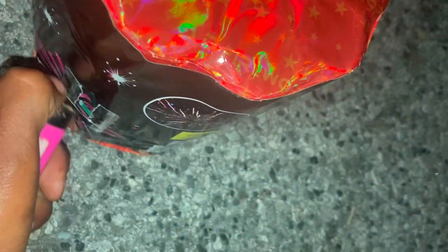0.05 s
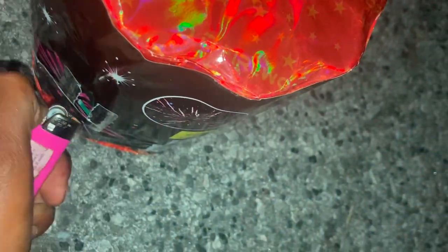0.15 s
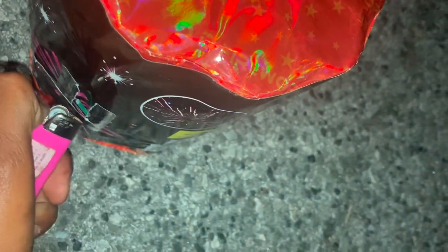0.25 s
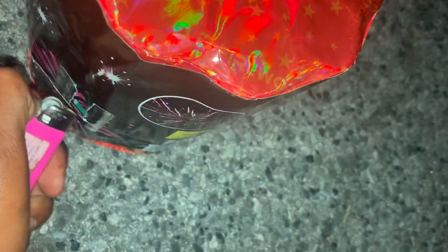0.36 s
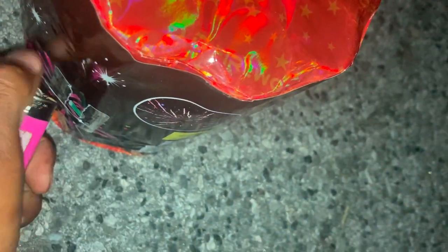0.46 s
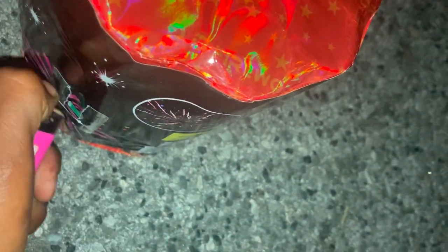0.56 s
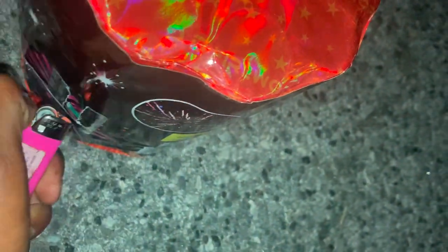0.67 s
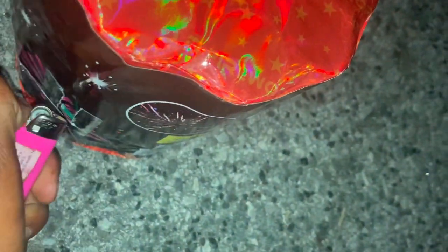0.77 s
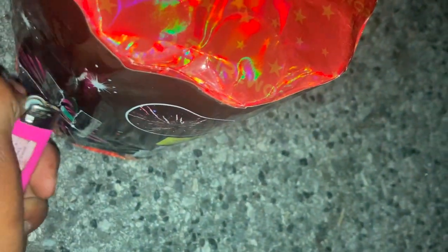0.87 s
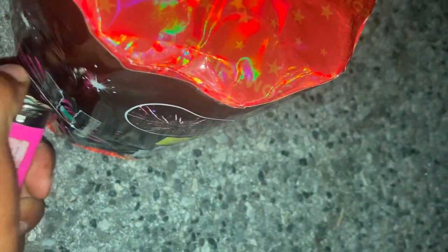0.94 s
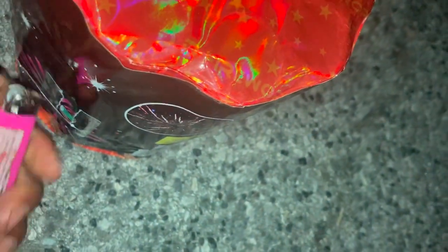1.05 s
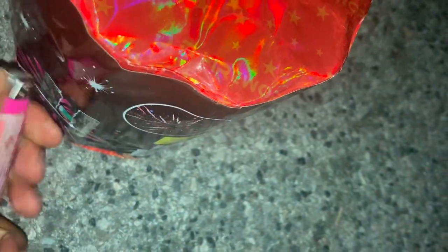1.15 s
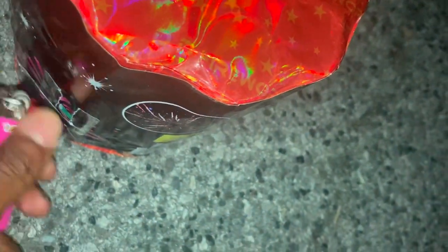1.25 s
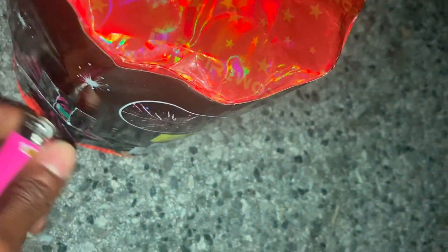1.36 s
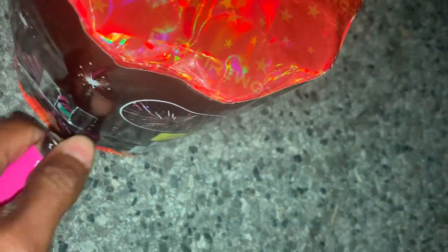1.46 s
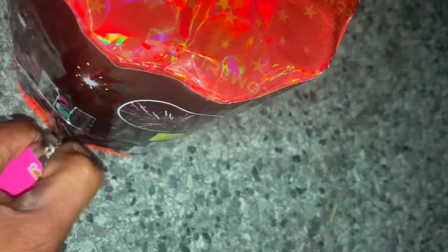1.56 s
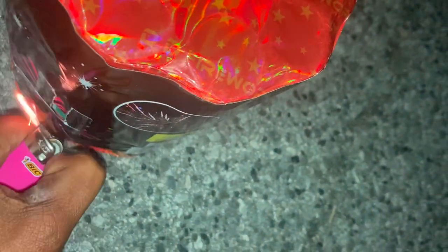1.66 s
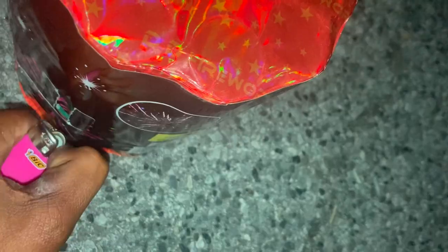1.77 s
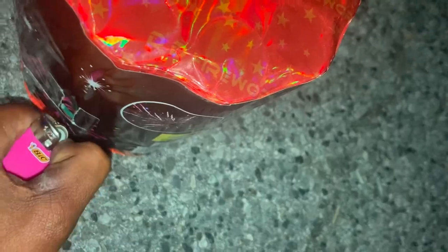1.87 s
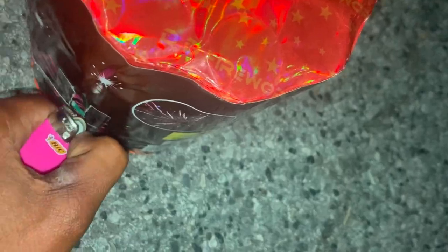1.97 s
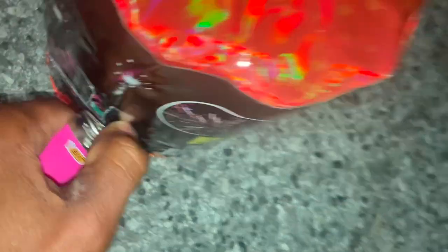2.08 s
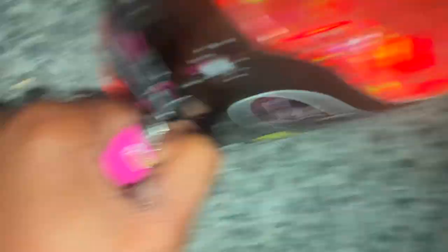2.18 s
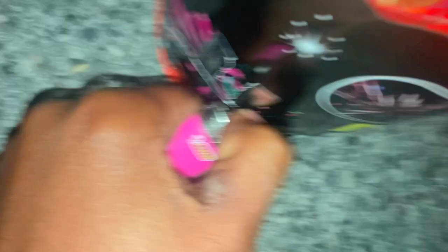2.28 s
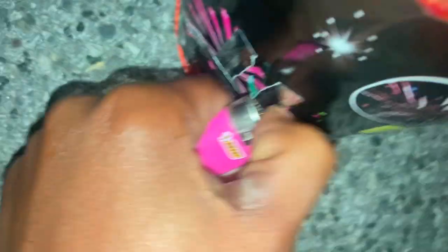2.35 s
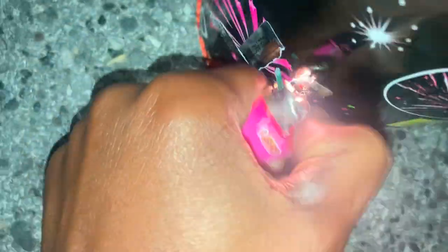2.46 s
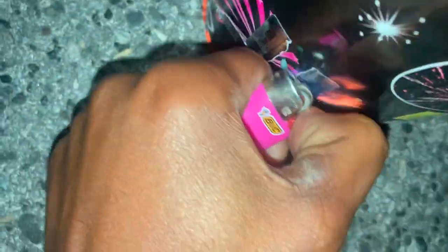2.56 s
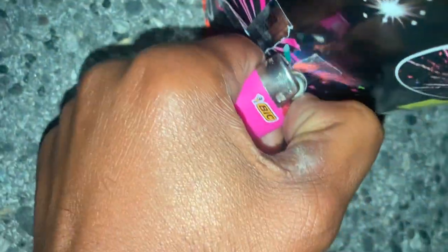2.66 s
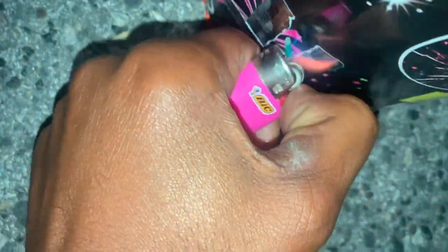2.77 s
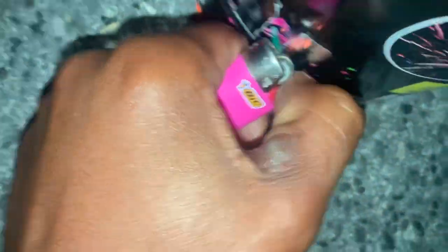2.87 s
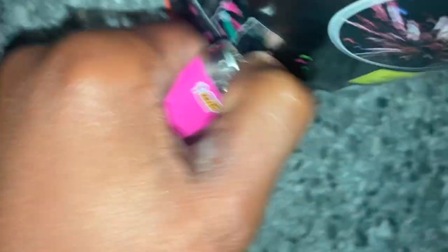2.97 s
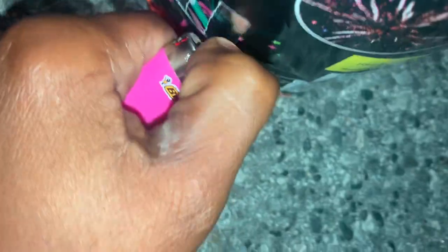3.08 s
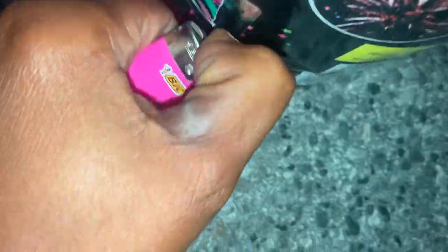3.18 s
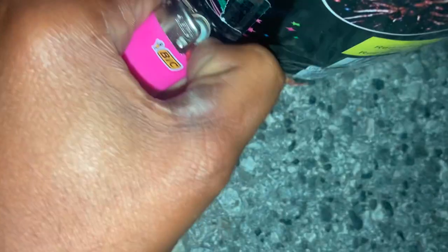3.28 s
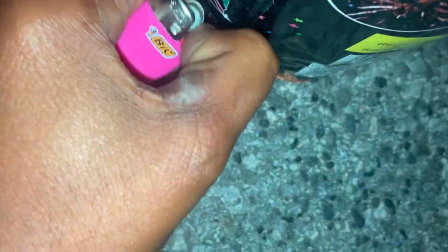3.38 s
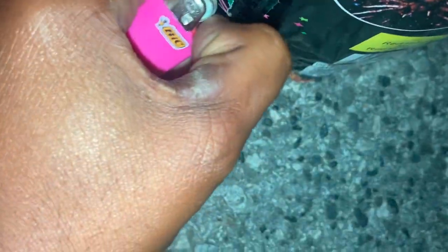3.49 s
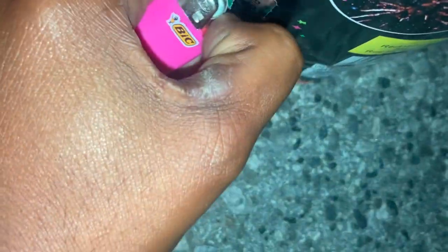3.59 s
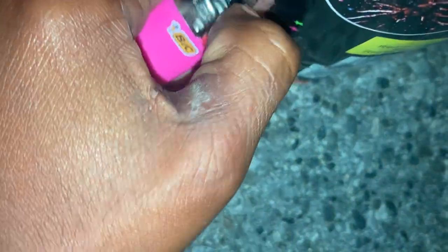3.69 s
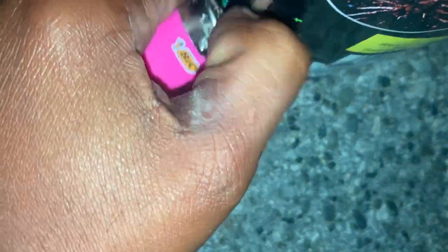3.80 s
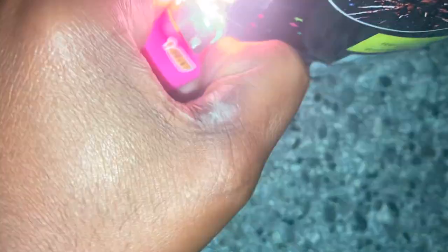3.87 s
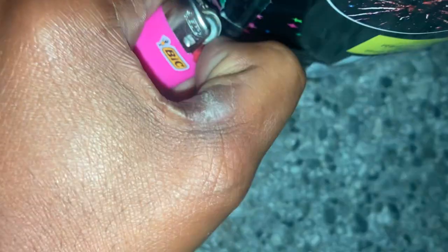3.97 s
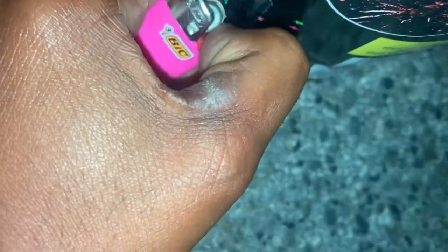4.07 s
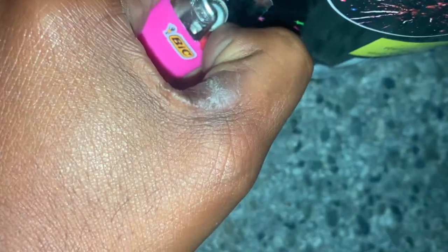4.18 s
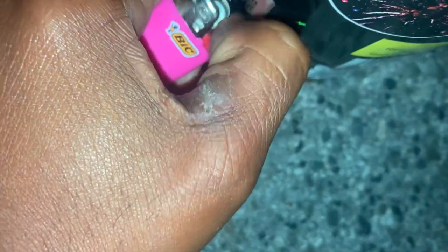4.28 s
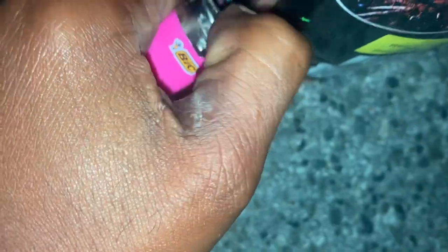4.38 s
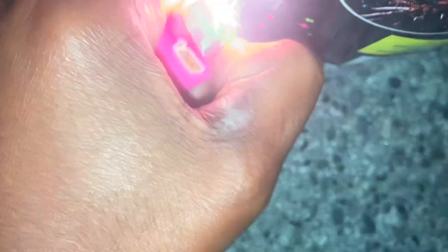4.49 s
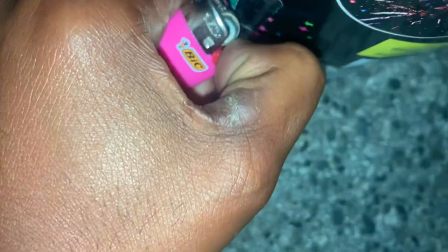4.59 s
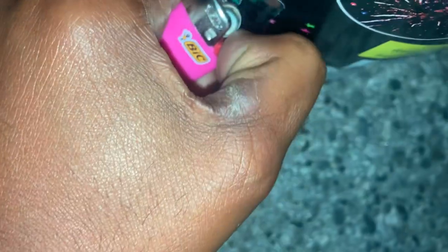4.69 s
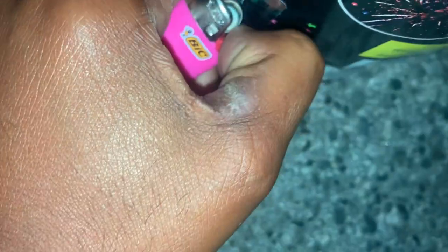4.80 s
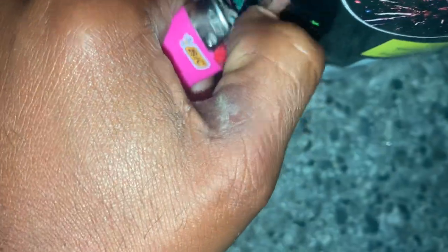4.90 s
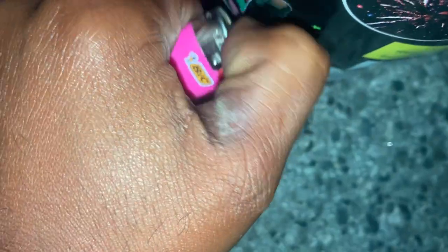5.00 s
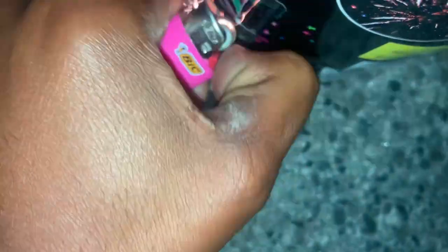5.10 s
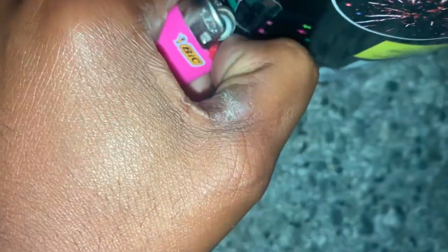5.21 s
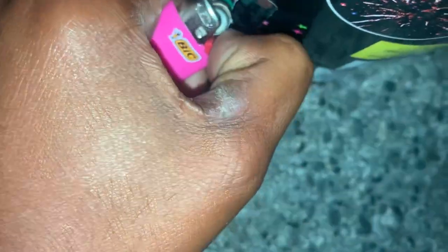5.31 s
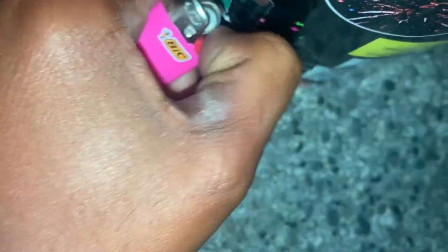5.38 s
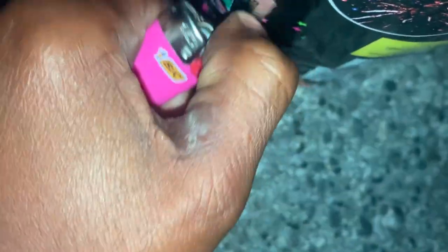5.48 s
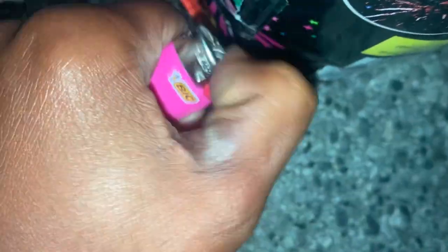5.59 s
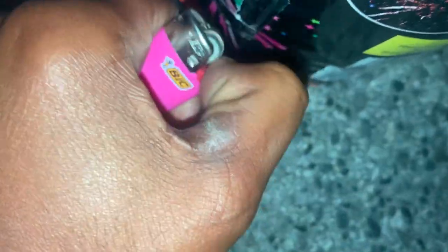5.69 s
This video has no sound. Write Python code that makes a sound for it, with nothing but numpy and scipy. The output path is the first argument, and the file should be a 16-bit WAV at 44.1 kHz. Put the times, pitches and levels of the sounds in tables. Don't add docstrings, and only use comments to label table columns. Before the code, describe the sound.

Outdoors in open air, dry steel-on-flint rasps crack close to a handheld stereo microphone, roughly every half to one second. Small lever clicks and dull plastic taps precede the later spins as the thumb resets. Behind lies gusty low rumble and soft airy hiss, with a far tree stirring mid-way. The background dips briefly after the strongest snaps, then recovers. There is practically no reverberation.

```python
import sys
import numpy as np
from scipy import signal
from scipy.fft import rfft, irfft, next_fast_len
from scipy.io import wavfile
from scipy.ndimage import uniform_filter1d

SR = 44100
rng = np.random.default_rng(int(sys.argv[2]) if len(sys.argv) > 2 else 0)


def ratio(d):
    e = np.asarray(d, float) / 20
    return 10 ** e


def pcm_store(signal):
    levels = np.round(np.clip(np.atleast_2d(signal), -1, 1) * 32767)
    wavfile.write(sys.argv[1], SR, levels.astype(np.int16).T)


N = 253465

# (fastest moment [s], scrape level [dB], run-up [s], run-out [s], gain duck [dB])
SPINS = [
    (0.14, -20, 0.016, 0.0064, 0),
    (.636, -24.5, 0.028, 0.016, 0.5),
    (1.614, -25, 0.016, 0.0091, 0),
    (2.49, -17.5, 0.016, 0.013, 3),
    (3.246, -17.5, 0.024, 0.013, 2.5),
    (3.876, -16.5, 0.017, 0.0097, 1),
    (4.512, -16.5, 0.017, 0.013, 2),
    (5.083, -20.5, 0.021, 0.013, 3.5),
    (5.626, -17.5, 0.015, 0.01, 1.5),
]
# (frequency [Hz], width [Hz], level [dB])
STEEL_MODES = [(1730, 490, -35), (2470, 3700, -9), (3720, 1940, -3), (5084, 1930, -8.5), (6510, 940, -5),
               (6810, 2000, 0), (8450, 955, 6), (10230, 1500, 2), (11360, 1100, 4), (13200, 2185, 0.5),
               (14700, 2900, -15)]
# (frequency [Hz], level per Hz [dB])
HISS_SPECTRUM = [(4500, -25.5), (6000, -7), (7500, -1.5), (8700, -5.5), (10300, -5.5), (12000, -4),
                 (13700, -13.5), (15000, -17.5), (15800, -14), (16500, -64.5)]

TICK_T60_S, TICK_KNOCK_DB = 0.0091, -22.5


def along(points, hz):
    f, v = np.transpose(points)
    return np.interp(np.log(hz + 1), np.log(f + 1), v)


def curves(rows):
    s, *cols = np.transpose(rows)
    return [np.interp(np.arange(N) / SR, s, c) for c in cols]


def unit(x):
    return x / np.sqrt(np.mean(x ** 2) + 1e-20)


def filtered(x, response):
    n = x.shape[-1]
    m = next_fast_len(n + 2048)
    return irfft(rfft(x, m) * response(np.fft.rfftfreq(m, 1 / SR)), m)[..., :n]


def add(track, s, sound):
    track[round(s * SR):][:len(sound)] += sound


def ports(pair):
    lag_s, cavity_hz = 10 / SR, 5050

    def turn(hz):
        return 2 * np.pi * hz * lag_s - 3.45 / (1 + (cavity_hz / (hz + 1)) ** 20)

    return filtered(pair, lambda hz: np.exp(-1j * np.outer([1, 0], turn(hz))))


def rush(spectrum, patchy_db):
    # (frequency [Hz], correlation [-1 to 1])
    likeness = [(60, 0.96), (250, 0.91), (500, 0.51), (800, 0.52), (1500, 0.59), (3000, 0.069),
                (5500, 0.22), (7000, 0.95), (8700, 0.92), (10500, 0.57), (13700, 0.93)]
    z = signal.stft(rng.standard_normal((2, N)), nperseg=512)[2]
    field = uniform_filter1d(rng.standard_normal(z.shape[1:]), size=6, axis=0)
    field = uniform_filter1d(field, size=14, axis=1)
    pair = signal.istft(z * ratio(patchy_db * unit(field)), nperseg=512)[1][:, :N]

    def spread(hz):
        angle = np.arccos(np.clip(along(likeness, hz), -1, 1)) / 2
        return ratio(along(spectrum, hz)) * [np.cos(angle), np.sin(angle)]

    same, other = filtered(pair, spread)
    return unit(np.array([same + other, same - other]))


def wind():
    # (time [s], gust strength [dB], exposure past the hand [dB])
    gusts = [(0.0, -3.5, 3), (0.45, -2, 1), (0.82, 1, -1.5), (1.15, -0.5, -3), (1.76, -1.5, -0.5),
             (2.34, -2.5, 3), (2.48, -1.5, -2), (2.69, -1.5, -2), (3.06, .5, -3.5), (3.3, -2, -8.5),
             (3.8, -2, -9), (4.2, -0.5, -12), (4.75, -2, -9), (4.92, -0.5, -10), (5.06, 0.5, -12.5),
             (5.23, -2, -11.5), (5.47, 0.5, -11.5), (5.75, -2.5, -15)]
    # (frequency [Hz], level per Hz [dB])
    rumble_spectrum = [(13, -55), (22, -31), (37, -8), (60, 1), (88, 0), (107, 1.5), (150, -6), (214, -5.5),
                       (244, -10), (333, -15), (395, -17.5), (500, -20), (650, -41), (1100, -120)]
    body_spectrum = [(150, -59), (300, -8), (500, -1.5), (900, -1.5), (1200, -5.5), (1600, -10),
                     (2200, -18), (3000, -18), (5000, -26.5), (6300, -33.5), (7500, -51.5)]
    leaves_spectrum = [(1300, -27), (1850, -8), (1960, -3), (2010, 9.5), (2090, 2.5), (2300, -0.5),
                       (2700, 0), (3300, -11), (4200, -10), (4650, -5), (5000, -6.5), (5300, -5),
                       (5800, -19), (7000, -38.5)]
    # (frequency [Hz], phase [rad])
    left_lead = [(30, 0), (340, .5), (700, 2.4), (1400, 3.1), (1720, 3.7), (2070, 5.9), (2760, 7),
                 (3600, 9.4), (4650, 12.3), (5860, 15.5), (8000, 21)]

    gust_db, exposure_db = curves(gusts)
    stir = np.interp(np.arange(N) / SR, np.cumsum([0.01, 0.46, 1.77, 1]), [0, 1, 1, 0])
    rumble_db = -28.5 + gust_db
    body_db = -40 + 0.45 * exposure_db - 0.47 * gust_db
    leaves_rest_db, leaves_stirred_db = -66, -46
    leaves_db = leaves_rest_db + (leaves_stirred_db - leaves_rest_db) * stir
    hiss_db = -58.5 + exposure_db + 0.1 * gust_db

    rumble = ratio(rumble_db + [[-.8], [.8]]) * rush(rumble_spectrum, patchy_db=1.08)
    body = ratio(body_db + [[3], [1.2]]) * rush(body_spectrum, patchy_db=2.0)
    leaves = ratio(leaves_db + [[-1.5], [-.8]]) * rush(leaves_spectrum, patchy_db=.9)
    hiss = ratio(hiss_db + 3) * rush(HISS_SPECTRUM, patchy_db=.5)

    def lead(hz):
        return np.exp(.5j * np.outer([1, -1], along(left_lead, hz)))

    return filtered(rumble + body + leaves, lead) + ports(hiss)


def ringing(x, modes, colour, scatter_db):
    hz, width, db = np.transpose(modes)[..., None]
    gain = ratio(db + scatter_db * rng.normal(size=hz.shape))
    sign = (-1) ** np.arange(len(modes))[:, None]

    def response(f):
        resonances = sign * gain * 1j * f * width / (hz * hz - f * f + 1j * f * width)
        return ratio(along(colour, f)) * np.sum(resonances, axis=0)

    return filtered(x, response)


def blow(modes, colour, t60_s, spike):
    t = np.arange(SR // 25) / SR
    fade = ratio(-60 * t / max(t60_s, .001)) * (1 - np.exp(-t / 0.00025))
    crack = fade * rng.standard_normal(len(t)) + spike * (np.arange(len(t)) == 4)
    sound = ringing(crack, modes, colour, scatter_db=1.0)
    return sound * np.linalg.norm(fade) / np.linalg.norm(sound) / 2


def shade(s):
    # (cup resonance [Hz], its strength [dB], tilt [dB per octave], tank body [dB])
    grip = [
        (3650, 17, 5.5, 8),
        (3470, 11, -2, -5),
        (4830, -2.5, -3, -15.5),
        (11800, 1, 4, 9.5),
        (4550, 4.5, 2, -7.5),
        (5660, 4.5, 4, 4),
        (6000, 3.5, 1, -6.5),
        (7000, 3, 2.5, -3.5),
        (7100, 1, 0.5, -8.5),
    ]
    cup_hz, strength_db, tilt_db, body_db = grip[np.argmin([abs(row[0] - s) for row in SPINS])]
    hz = np.geomspace(1000, 16000, 49)
    width_oct, dip_ratio, dip_depth = .28, 1.32, 0.55
    tilt_centre_hz, body_top_hz = 6000, 2450

    def bump(centre_hz):
        return np.exp(-(np.log2(hz / centre_hz) / width_oct) ** 2)

    cup_db = strength_db * (bump(cup_hz) - dip_depth * bump(cup_hz * dip_ratio))
    slope_db = tilt_db * np.log2(hz / tilt_centre_hz)
    return np.transpose([hz, cup_db + slope_db + body_db / (1 + (hz / body_top_hz) ** 8)])


def teeth():
    # (time [s], peak [dB], t60 [s])
    bites = [(0.138, 0, 0.0054), (0.1392, -2.5, 0.014), (0.1447, -10, 0.0058), (0.1495, -20, 0.0071),
             (0.633, -12, 0.0096), (0.6354, -2.5, 0.014), (0.645, -14, 0.009), (1.6141, -3.5, 0.017),
             (1.6167, -1, 0.0085), (1.6222, -13.5, 0.014), (2.487, -11.5, 0.014), (2.491, 0.5, 0.0096),
             (3.2455, -3, 0.013), (3.8708, -5.5, 0.011), (3.8754, 1.5, 0.0096), (3.8762, -10.5, 0.0043),
             (3.8855, -13, 0.0091), (4.5096, -3, 0.017), (5.0845, -3, 0.014), (5.6221, -13, 0.011),
             (5.6259, 4, 0.006), (5.6334, -18, 0.0051)]
    track = np.zeros(N + SR)
    for s, db, t60_s in bites:
        add(track, s, ratio(db + 1.5) * blow(STEEL_MODES, shade(s), t60_s, spike=1.9))
    return track[:N]


def wheel():
    track = np.zeros(N + SR)
    t = np.arange(-SR // 16, SR // 16) / SR
    for s, db, run_up_s, run_out_s, _ in SPINS:
        phase = np.abs(t) / np.where(t < 0, run_up_s, run_out_s)
        drag = ratio(-20) / (1 + phase ** 12)
        swell = ratio(db) * (ratio(-34 * phase ** 1.1) + drag)
        lumps = ratio(1.8 * unit(uniform_filter1d(rng.standard_normal(len(t)), size=40)))
        grit = rng.standard_normal(len(t)) * ratio(4 * rng.standard_normal(len(t)))
        scrape = ringing(grit, STEEL_MODES, shade(s), scatter_db=1.5)
        add(track, s + t[0], swell * unit(lumps * scrape))
    return track[:N]


def rattle():
    # (time [s], peak [dB], brightness [dB])
    loose = [(0.1575, -24, -18), (0.426, -34, 3), (0.435, -21, 13), (0.667, -37, -5), (0.8945, -33, 10),
             (0.901, -25, -4), (0.9071, -20.5, 8), (1.169, -29, 12), (2.044, -30, 8), (2.514, -24, -5),
             (2.596, -29, -11), (2.939, -30.5, 0), (3.2123, -34, 4), (3.266, -22, -26), (3.291, -24, 7),
             (3.836, -37, 5), (3.9103, -20.5, -7.5), (4.0823, -27.5, -1), (4.313, -38, -19),
             (4.343, -37, 1), (4.35, -33, -4), (4.485, -36, -4), (4.4964, -31, 9), (4.5378, -28, -4),
             (4.5544, -34, 2), (5.11, -22, -21), (5.118, -21, 0), (5.127, -18.5, 4), (5.168, -31, 15)]
    return [(s, db, bright_db, TICK_T60_S, TICK_KNOCK_DB) for s, db, bright_db in loose]


def presses():
    # (time [s], peak [dB], knock [dB], rebound delay [s], rebound level [dB])
    takeups = [
        (3.0681, -60, 22, .004, -23.5),
        (3.695, -15.5, -16, .0088, -13),
        (4.3207, -14, -13.5, 0.008, -15.5),
        (4.8831, -13, -16, .0134, -12),
        (5.4838, -21, -14, 0.0054, -25),
    ]
    bright_db = -4
    rows = []
    for s, db, knock_db, gap_s, rebound_db in takeups:
        rows.append((s, db, bright_db, 0.0059, knock_db))
        rows.append((s + gap_s, db + rebound_db, bright_db, TICK_T60_S, knock_db + 1.5))
    return rows


def landings():
    # (time [s], peak [dB], brightness [dB], settling delay [s])
    touches = [
        (3.6484, -26.5, -1.5, 0.0091),
        (4.2724, -28, -1, .0097),
        (4.829, -24.5, 3, .0094),
        (5.4078, -21, 8.5, 0.007),
    ]
    knock_db = -28
    rows = []
    for s, db, bright_db, gap_s in touches:
        rows.append((s, db, bright_db, TICK_T60_S, knock_db))
        rows.append((s + gap_s, db - 11, bright_db, TICK_T60_S, knock_db))
    return rows


def ticks():
    # (frequency [Hz], width [Hz], level [dB])
    lever_modes = [(2940, 910, -50), (6800, 5000, 8.5), (10700, 6100, 11), (14500, 3500, -2.5)]
    tank_modes = [(1074, 580, -2.5), (1670, 83, 4.5), (2203, 2600, -10)]
    tank_colour = [(600, -6.5), (1000, 0), (3000, 0), (5000, -9.5)]  # (Hz, dB)
    track = np.zeros(N + SR)
    for s, db, bright_db, t60_s, knock_db in rattle() + presses() + landings():
        lever_colour = [(4000, -bright_db), (16000, bright_db)]
        add(track, s, ratio(db - 0.5) * blow(lever_modes, lever_colour, t60_s, spike=0.47))
        add(track, s, ratio(db + knock_db + 13.5) * blow(tank_modes, tank_colour, t60_s, spike=3.1))
    return track[:N]


def lighter():
    return wheel() + teeth() + ticks()


def scene():
    # (frequency [Hz], level [dB])
    far_side = [(800, 4.5), (2500, 5.5), (4300, 6.5), (5500, -15.5), (6500, -14), (16000, -32.5)]
    near = lighter() * ratio([[-.5], [.5]])
    flank = filtered(lighter(), lambda hz: ratio(along(far_side, hz)))
    return ports(near + flank * [[1], [0]]) + wind()


def low_pass(x):
    return signal.sosfilt(signal.butter(12, 16970, fs=SR, output="sos"), x)


def record(dry):
    t = np.arange(N) / SR
    duck_db = np.zeros(N)
    for s, *_, depth_db in SPINS:
        after_s = np.clip(t - s - .004, 0, None)
        duck_db += depth_db * 4.94 * (np.exp(-after_s / 0.087) - np.exp(-after_s / 0.012))
    self_noise = ratio(-84.5) * ports(rush(HISS_SPECTRUM, patchy_db=4.2))
    x = dry * ratio(-duck_db) + self_noise
    x = x / (1 + np.abs(x / .9) ** 4) ** .25
    x = filtered(x, lambda hz: ratio(-46.5) + 1 / (1 + (hz / 15900) ** 150))
    return low_pass(x)


dry = scene()
out = record(dry)
pcm_store(out)
```